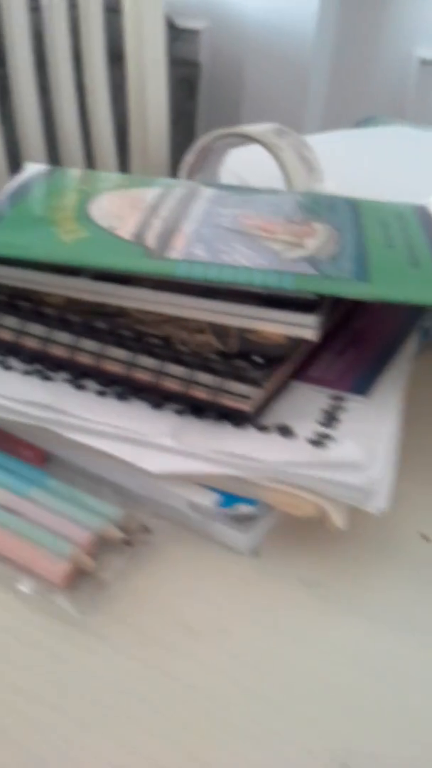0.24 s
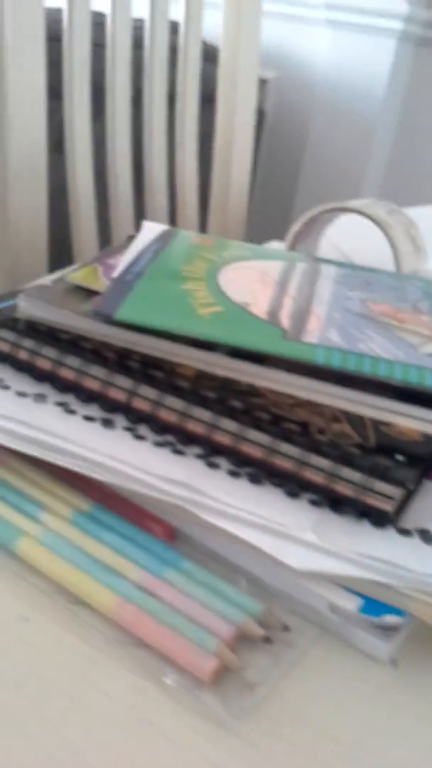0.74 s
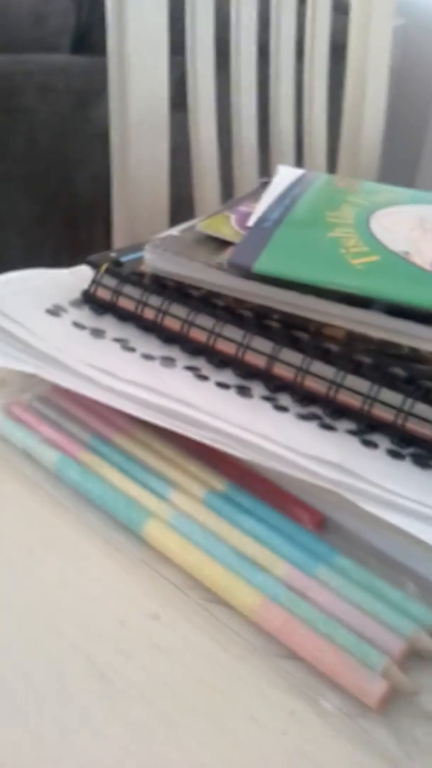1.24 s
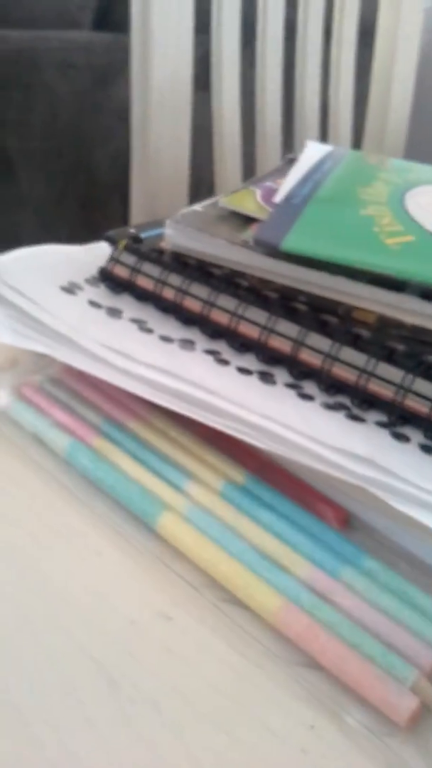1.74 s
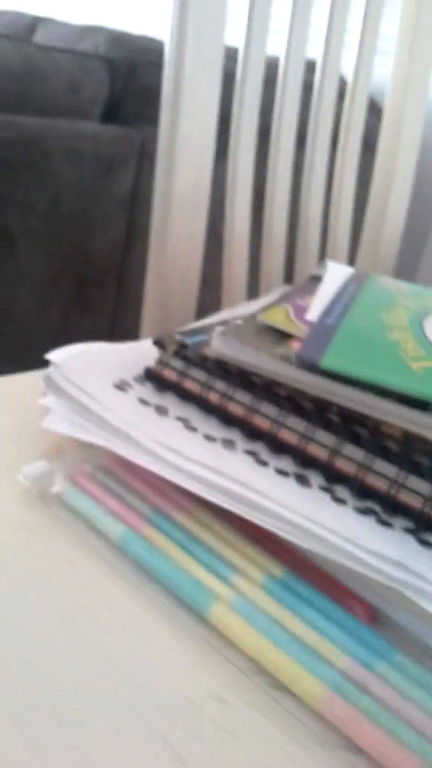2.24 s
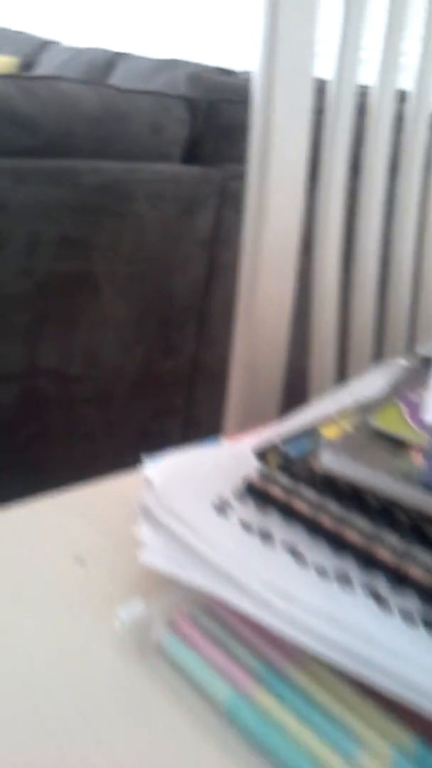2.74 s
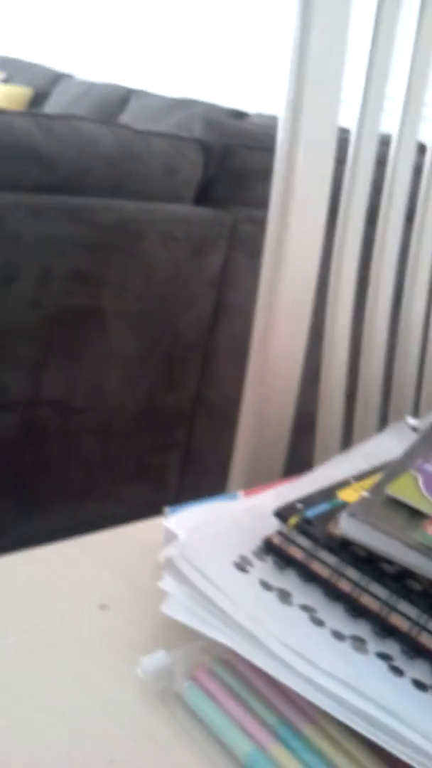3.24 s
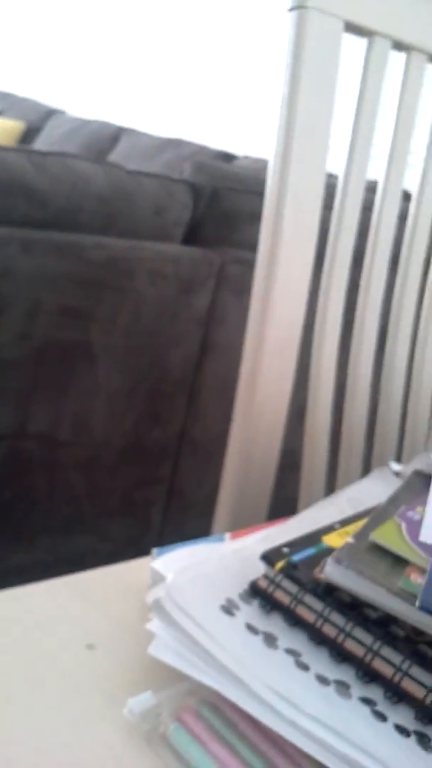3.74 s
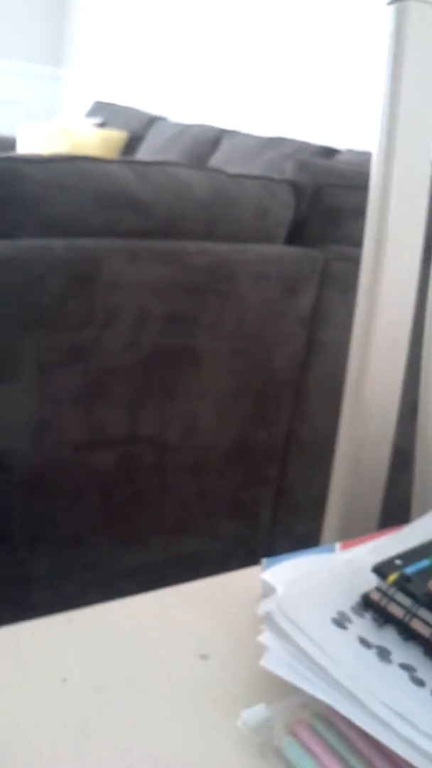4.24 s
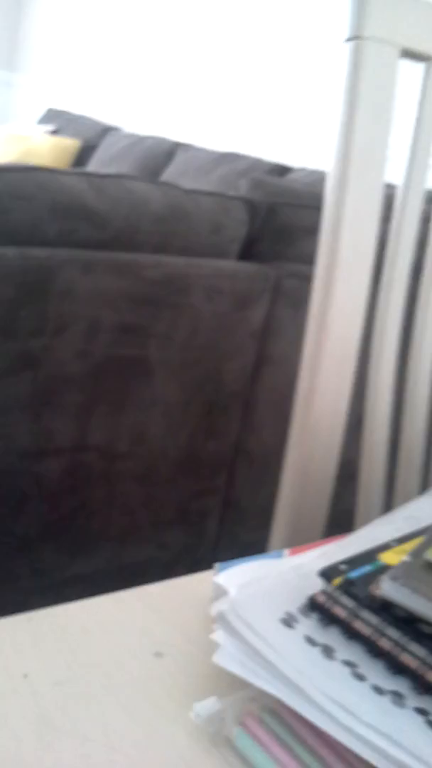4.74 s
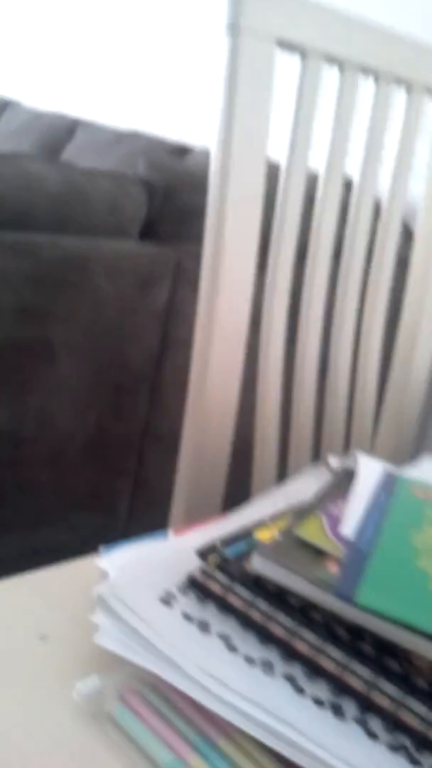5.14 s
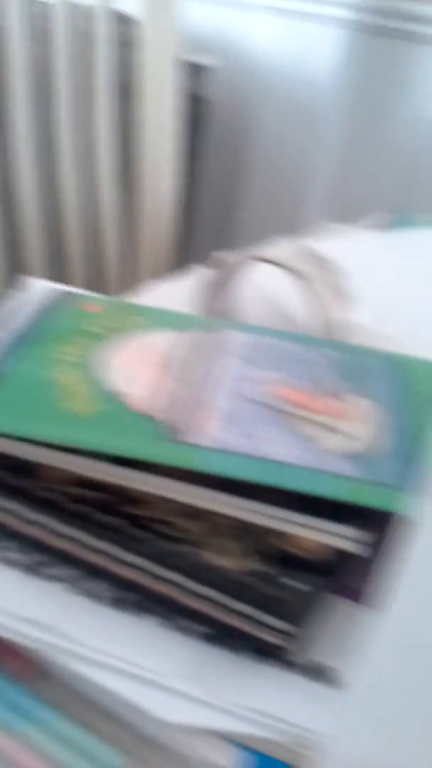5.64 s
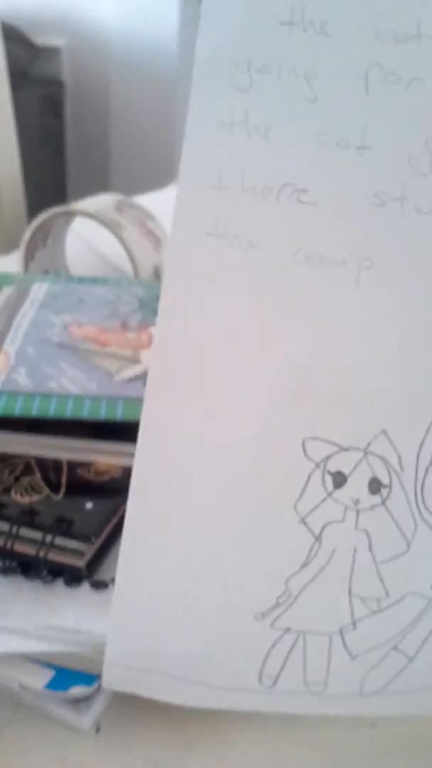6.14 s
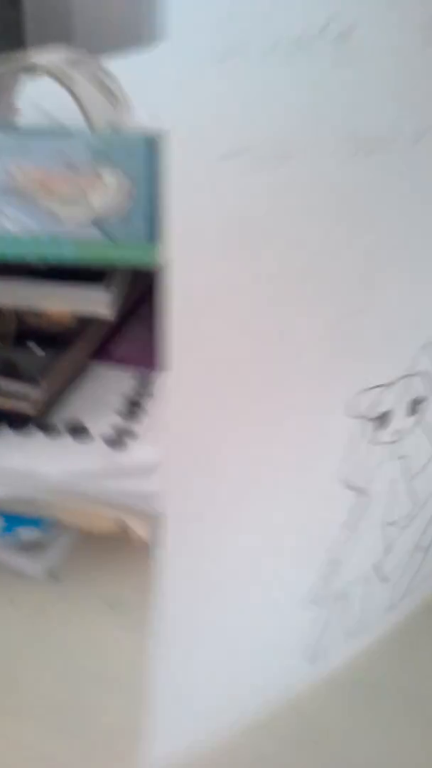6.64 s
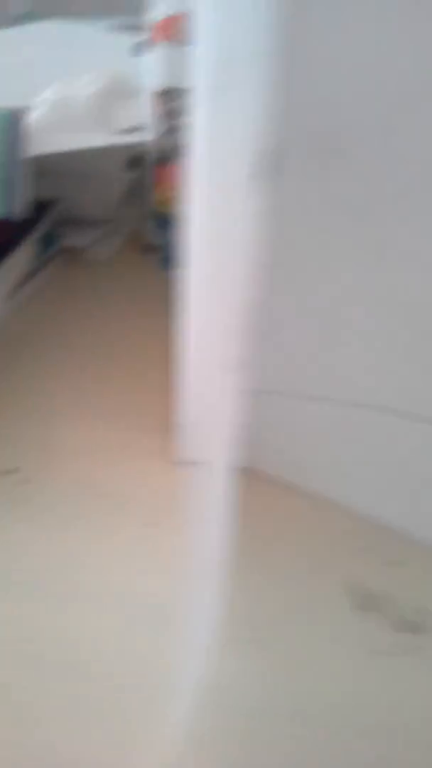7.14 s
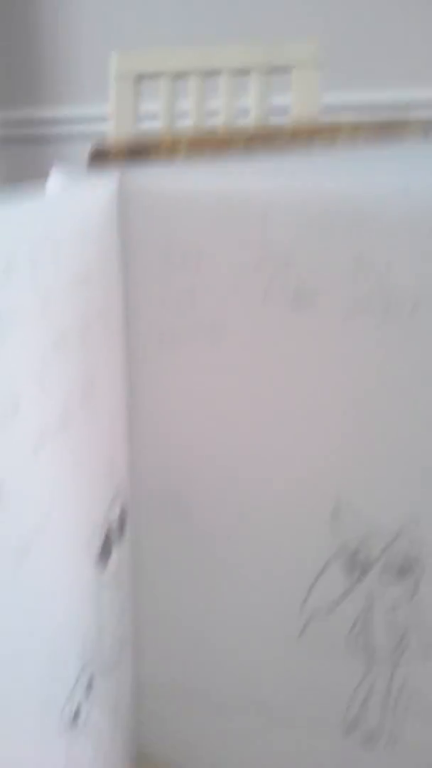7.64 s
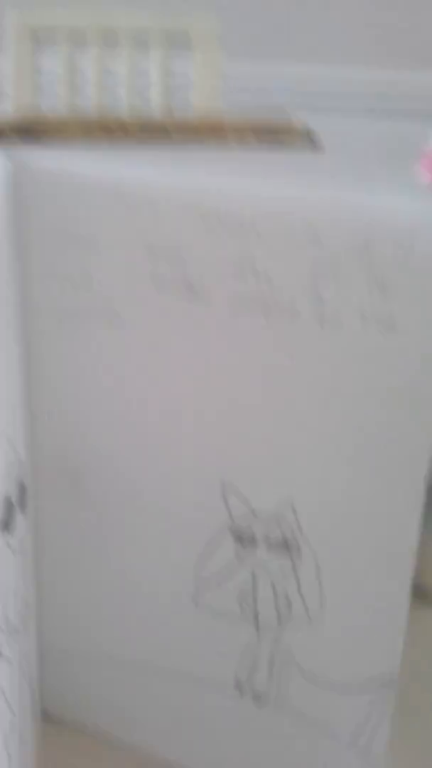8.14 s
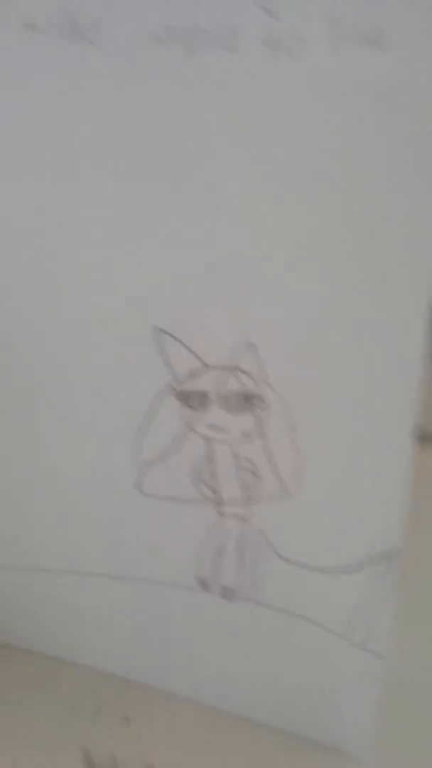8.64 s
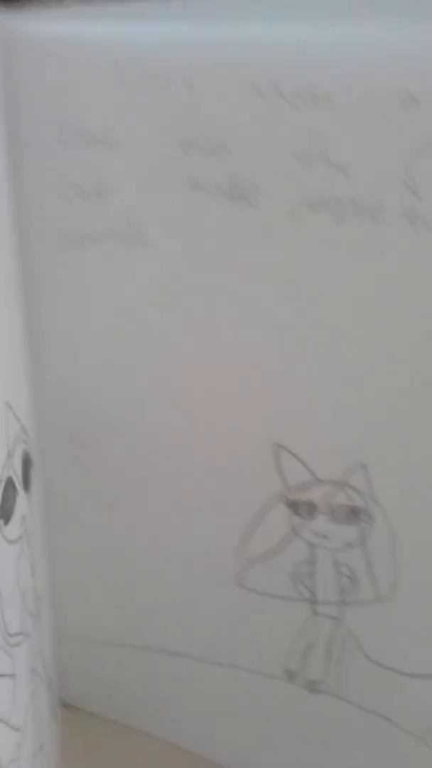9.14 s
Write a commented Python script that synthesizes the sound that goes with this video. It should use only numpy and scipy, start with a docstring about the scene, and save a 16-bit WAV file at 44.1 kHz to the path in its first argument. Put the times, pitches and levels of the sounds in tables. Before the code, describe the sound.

Paper sheets slide softly over a table, close by, above the low murmur of a quiet furnished room. Short rasps and hisses mix with light notebook knocks. At 1.7 seconds a stiff edge clicks sharply on the left, right by the microphone. At 2.7 something hard is set down with a double clack, and a knock at 3.1 leaves a faint, thin ring. Paper edges tick here and there. From about 4.6 to 5.5 the rustling grows stronger, with a run of small bumps, trailing into a very faint squeak near 5.7. Another short rustle and tap come at 6.3, then a lull. From 7.7 a page glides through fingers with a bright hiss, passing from right to left, then bends and buckles in a quick cluster of crisp snaps between 8.2 and 8.4. A few light knocks follow around 9.1.

```python
"""First a paper sheet slides softly over a table, above the low murmur of a quiet room.
More sheets rasp and hiss as their fibres catch, notebooks knock lightly and paper edges tick.
A stiff edge clicks right by the microphone, then something hard is set down with a double clack.
One knock leaves a thin ring, and one pull ends in a faint squeak. Near the end a page glides
through the fingers, bends and buckles in a quick cluster of snaps."""
import sys
import numpy as np
from scipy import signal
from scipy.fft import rfft, irfft, next_fast_len
from scipy.io import wavfile
from scipy.ndimage import uniform_filter1d, map_coordinates

SR = 44100
rng = np.random.default_rng(int(sys.argv[2]) if len(sys.argv) > 2 else 0)


def put_to_file(sound):
    """Save the sound as 16-bit audio at rate SR, in the file named by the first command-line argument."""
    columns = np.atleast_2d(sound).T  # one column per channel
    safe = np.clip(columns, -1, 1)
    whole_steps = np.round(safe * 32767)
    wavfile.write(sys.argv[1], SR, whole_steps.astype(np.int16))


N = 414540
TIME = np.arange(N) / SR
SHORT = np.arange(SR // 4) / SR  # the time line of one short sound [s]


def amp(db):
    """Turn decibels into a number to multiply a sound by."""
    return 10 ** (np.asarray(db) / 20)


def unit(x):
    """Scale a signal so that its average power is 1."""
    return x / np.sqrt(np.mean(x ** 2) + 1e-20)


def norm(x):
    """Scale each channel so that its total energy is 1."""
    return x / np.linalg.norm(x, axis=-1, keepdims=True)


def along(points, hz):
    """Read between (frequency, value) points, with the octaves evenly spaced."""
    freqs, values = np.transpose(points)
    return np.interp(np.log(hz + 1), np.log(freqs + 1), values)


def panned(db):
    """Gains that make the left side db louder than the right, at the same total power."""
    pair = np.array([amp(db / 2), amp(-db / 2)]).reshape(2, -1)
    return pair / np.sqrt(np.mean(pair ** 2, axis=0))


def filtered(x, response):
    """Turn each frequency of x up or down by response(frequency)."""
    n = x.shape[-1]
    padded = next_fast_len(n + SR // 4)
    return irfft(rfft(x, padded) * response(np.fft.rfftfreq(padded, 1 / SR)), padded)[..., :n]


def coloured(x, points):
    """Give x the tone of (frequency, level) points, without smearing it to before its start."""
    def response(hz):
        cepstrum = irfft(np.log(amp(along(points, hz))))
        half = len(cepstrum) // 2
        forward_only = np.r_[cepstrum[0], 2 * cepstrum[1:half], np.zeros(half)]
        return np.exp(rfft(forward_only))
    return filtered(x, response)


def resonances(peaks, hz):
    """Add up the power of (frequency, width, level) peaks: the pitches a thing likes to ring at."""
    return sum(amp(db) ** 2 / (1 + (2 * (hz - centre) / width) ** 2) for centre, width, db in peaks)


# How alike left and right sound: (frequency [Hz], likeness [1 = same, 0 = unrelated])
LIKENESS = [(30, -0.56), (130, .9), (300, 0.87), (600, 0.33), (1200, -0.078), (4000, 0.04), (12000, 0.016)]

def stereo(x):
    """Blend two unrelated noises as the microphone's two sides hear them: alike in the bass only."""
    def blend(hz):
        angle = np.arccos(np.clip(along(LIKENESS, hz), -1, 1)) / 2
        return np.array([np.cos(angle), np.sin(angle)])
    middle, side = filtered(x, blend)
    return np.array([middle + side, middle - side])


def wobble(rate):
    """A smooth random curve that passes through rate new values a second."""
    return map_coordinates(rng.standard_normal(int(N * rate / SR) + 4), [TIME * rate])


def rush(tone, grain=0, catches_per_s=500, patchy_db=0):
    """Long stereo noise: grain adds tiny catches of fibres, patchy_db adds passing resonances."""
    catches = (rng.random(N) < catches_per_s / SR) * rng.random(N)
    catch_decay = np.exp(-1 / (.0004 * SR))
    roughness = unit(signal.lfilter([1], [1, -catch_decay], catches))
    noise = rng.standard_normal((2, N)) + grain * roughness * rng.standard_normal((2, N))
    bands = signal.stft(noise, nperseg=512)[2]
    patches = uniform_filter1d(rng.standard_normal(bands.shape[1:]), size=3, axis=0)  # blur in pitch
    patches = uniform_filter1d(patches, size=9, axis=1)  # blur in time
    noise = signal.istft(bands * amp(patchy_db * unit(patches)), nperseg=512)[1][:, :N]
    return unit(filtered(stereo(noise), lambda hz: amp(along(tone, hz))))


def burst(fade_s, rise_s=1e-5):
    """A puff of stereo noise. Here and below, a fade is the time a sound takes to drop by 60 dB."""
    swell = 1 - np.exp(-(SHORT / rise_s) ** 2)
    decay = amp(-60 * SHORT / max(fade_s, 1e-3))
    return norm(rng.standard_normal((2, len(SHORT))) * swell * decay)


def add(track, start, sound):
    """Mix a sound into the track, beginning at start seconds."""
    part = track[:, round(start * SR):][:, :sound.shape[1]]
    part += sound[:, :part.shape[1]]


def stroke(start, rise, hold, fall, rise_db=12, fall_db=13):
    """The loudness of one hand movement: it gathers speed, holds and dies away."""
    early = np.maximum(start + rise - TIME, 0) / max(rise, 1e-3)
    late = np.maximum(TIME - (start + rise + hold), 0) / max(fall, 1e-3)
    return amp(-np.minimum(rise_db * early + fall_db * late, 100))


def strokes(rows):
    """Rasp and hiss gains for a series of movements; overlapping ones add their power."""
    power = np.zeros((2, N))
    for *timing, rasp_db, hiss_db in rows:
        power += (amp([[rasp_db], [hiss_db]]) * stroke(*timing)) ** 2
    return np.sqrt(power)


# The lower, rough part of rubbing paper: (frequency [Hz], relative level [dB])
RASP_TONE = [(150, -28), (470, -0.5), (620, -1), (790, -5), (1120, -4.5), (1450, -5), (1780, -3),
             (2150, -5), (2600, -7), (4000, -11), (6000, -23)]

def rubbing(gains, hiss_tone, rasp_db, hiss_db, grain, catches_per_s, judder_db, patchy_db):
    """Paper fibres catch and let go, while the flexing sheet shifts its resonances."""
    rasp_gain, hiss_gain = gains
    pressure = amp(judder_db * wobble(70))
    rasp = rasp_gain * amp(rasp_db) * rush(RASP_TONE, grain, catches_per_s, patchy_db)
    hiss = hiss_gain * amp(hiss_db) * rush(hiss_tone, grain, catches_per_s, patchy_db / 2)
    return pressure * (rasp + hiss)


# Sheet moving over sheet:
# (start [s], rise [s], hold [s], fall [s], relative rasp level [dB], relative hiss level [dB])
SHEET_STROKES = [(0.0, 0.0069, .05, 0.5, -62.5, -61), (0.52, .19, .04, 0.13, -60, -53),
                 (0.54, 0.026, 0.017, 0.063, -54, -63), (0.873, .003, .012, .008, -60, -44),
                 (0.885, 0.039, .025, 0.096, -52, -44.5), (1.05, .05, .05, 0.073, -64, -58),
                 (1.22, 0.32, .04, 0.069, -59, -52), (1.74, 0.017, .12, 0.062, -63, -56),
                 (2.22, 0.074, .01, 0.077, -76, -65), (2.73, .06, 0.072, 0.15, -50.5, -58),
                 (3.12, 0.026, .17, .08, -61, -62.5), (3.44, .03, .02, .08, -68, -60),
                 (3.57, 0.043, .01, 0.075, -67, -59.5), (3.72, .14, 0.018, 0.079, -64, -63.5),
                 (3.99, 0.026, 0.0088, 0.099, -58, -56), (4.08, 0.027, 0.017, .15, -59, -59),
                 (4.15, 0.25, .13, .1, -58, -57.5), (4.59, 0.027, .11, .15, -48, -42.5),
                 (4.68, 0.049, 0.015, .11, -42.5, -44.5), (4.86, 0.035, .02, 0.23, -60, -56.5),
                 (5.13, 0.12, 0.045, .08, -60.5, -59), (5.34, 0.088, .12, 0.097, -48.5, -51),
                 (5.41, 0.085, 0.0056, 0.057, -51, -41), (5.9, 0.058, 0.0072, 0.065, -57, -56.5),
                 (6.26, 0.046, 0.02, 0.054, -55, -47), (6.4, 0.037, .005, 0.033, -55.5, -55.5),
                 (6.82, 0.072, .01, 0.12, -63, -62.5), (7.24, .13, .02, 0.13, -75, -65),
                 (8.45, 0.046, .03, 0.28, -65, -66), (8.98, 0.087, 0.14, 0.091, -63, -66.5)]
# The hiss of those sheets: (frequency [Hz], relative level [dB])
SHEET_HISS_TONE = [(1800, -23), (3000, -13.5), (4400, -7.5), (5800, -1.5), (7500, -7), (9000, -11.5),
                   (12000, -16.5), (14500, -21)]

def sliding_sheets():
    """Sheets rub with each push of the hand; in between, the pile never lies quite still."""
    stirring = amp([[-71], [-73]]) * amp(1.5 * wobble(rate=6))  # faint rasp and hiss gains
    gains = np.hypot(strokes(SHEET_STROKES), stirring)
    return rubbing(gains, SHEET_HISS_TONE, rasp_db=-2, hiss_db=1,
                   grain=0.63, catches_per_s=1500, judder_db=1.37, patchy_db=4)


# The low murmur of the room and of handling: (time [s], relative level [dB])
MURMUR_LEVELS = [(0.0, -58.5), (0.52, -63), (0.94, -57.5), (1.75, -58), (2.02, -63), (2.67, -63.5),
                 (2.88, -58), (3.61, -62), (5.58, -58), (6.1, -62), (7.59, -62), (8.46, -56.5),
                 (8.87, -63.5), (9.4, -63)]
# The tone of that murmur: (frequency [Hz], relative level [dB])
MURMUR_TONE = [(15, -56), (25, -32), (33, -69), (75, -27), (109, -10.5), (130, -5.5), (168, -5),
               (213, -4.5), (263, -0.5), (335, -1), (494, -7), (900, -17), (1170, -34), (1980, -120)]
# Low notes that the room strengthens: (frequency [Hz], width [Hz], relative level [dB])
ROOM_NOTES = [(144.6, 12.7, 5.5), (210, 16.6, 6.5), (338.5, 7.9, 5), (402, 62, -1)]
# Faint humming tones: (frequency [Hz], typical level [dB])
HUM_NOTES = [(141, -75), (337, -70.5)]
# The even background hiss: (frequency [Hz], relative level [dB])
AIR_TONE = [(290, -16.5), (500, -9.5), (666, -14), (827, -7), (1470, -13.5), (3740, -16.5), (5920, -19),
            (8600, -18.5), (13800, -18.5), (14800, -22), (15500, -56)]

def background(murmur_boost_db=1.5, air_db=-66):
    """A low murmur that gathers at the room's own notes, a faint wavering hum and an even hiss."""
    murmur_db = np.interp(TIME, *np.transpose(MURMUR_LEVELS)) + murmur_boost_db
    murmur = unit(filtered(rush(MURMUR_TONE), lambda hz: np.sqrt(1 + resonances(ROOM_NOTES, hz))))
    hum = sum(amp(db + 3 * wobble(7.9)) * np.sin(2 * np.pi * hz * TIME + wobble(6))
              for hz, db in HUM_NOTES)
    return amp(murmur_db) * murmur + hum + amp(air_db) * rush(AIR_TONE)


# Light knocks on the table: (time [s], relative scuff level [dB], contact time [s],
# relative thud level [dB], thud pitch [Hz], scuff fade [s])
LIGHT_KNOCKS = [(0.281, -11.5, .0005, -12, 230, .065), (0.556, -4, 0.0004, -14, 410, 0.087),
                (0.737, -7, .00085, -12, 363, 0.062), (0.81, -5.5, 0.00073, -21, 317, 0.024),
                (1.074, -8.5, .0008, -17, 350, 0.061), (1.381, -4.5, .00083, -4.5, 324, .059),
                (1.622, -3.5, .0007, -2, 330, .09), (3.125, -13, .0003, 0, 332, 0.023),
                (4.09, -19, 0.00048, -5.5, 453, .033), (4.623, -6, .00045, -24, 500, .046),
                (4.722, -4.5, 0.00046, -6.5, 543, .06), (4.74, -6, .0008, -8, 500, .05),
                (4.757, -6, .00053, -3, 463, 0.048), (4.897, -4.5, 0.00052, -5, 484, 0.12),
                (5.198, -1, 0.00036, -8, 480, 0.055), (5.341, -19, 0.00047, -11, 450, 0.03),
                (5.381, -8.5, .0007, -7.5, 384, 0.067), (5.545, -9.5, 0.00044, -0.5, 260, .08),
                (5.96, -15, 0.00071, -18, 298, .03), (6.275, -7.5, 0.00016, 2, 383, 0.0065),
                (6.324, -12, 0.00057, -7.5, 517, .035), (6.829, -15, 0.00071, -19, 350, 0.021),
                (9.095, -1, .0011, -3, 394, 0.045), (9.111, -10, .00125, -5.5, 322, 0.046),
                (9.193, 2, 0.00069, -5, 440, 0.026)]
# The scuff before the soft contact dulls it: (frequency [Hz], relative level [dB])
SCUFF_TONE = [(150, -23.5), (600, -1.5), (1000, 1), (1400, -2.5), (2100, -1.5), (4000, -2), (6000, 3),
              (9500, -8.5), (15000, -13)]

def knocks(rise_s=0.0011):
    """A cushioned bump gives one low push, a shudder of the table top and a brief scuff of the pile."""
    out = np.zeros((2, N))
    push = 1. * (SHORT == 0)
    for start, scuff_db, contact_s, thud_db, hz, fade_s in LIGHT_KNOCKS:
        shudder = 1.15 * norm(stereo(burst(2 * fade_s, 2 * rise_s)))
        scuff = norm(stereo(burst(fade_s, rise_s) + 0.67 * burst(0.014, rise_s)))
        # where the table is hit sets the pitch of the thud
        thud_tone = [(hz / 6, -36), (hz / 2, -9), (hz, 2), (2 * hz, -10), (6 * hz, -50)]
        add(out, start, amp(thud_db) * coloured(push + shudder, thud_tone))
        # the longer the contact, the duller the scuff
        cushion = lambda f: 1 / (1 + 1j * np.sqrt(2) * f * contact_s - (f * contact_s) ** 2)
        add(out, start, amp(scuff_db) * filtered(coloured(scuff, SCUFF_TONE), cushion))
    return out * panned(1.8)


# Paper edges ticking and buckling:
# (time [s], relative level [dB], pitch [Hz], relative level of the low part [dB], left over right [dB])
PAPER_SNAPS = [(0.8754, -34, 5950, -24, -6), (0.8837, -32, 6100, -22, 3), (1.7456, -26.5, 4300, 5.5, 17),
               (2.8529, -34.5, 5350, -13, 0.0), (2.8923, -32, 5390, -3, -1), (3.4633, -32.5, 5400, -32, 4),
               (4.016, -32, 6200, -12, 7), (4.0337, -32.5, 6150, -26, 7.0), (4.1455, -32, 5160, -10.5, 7),
               (4.426, -27.5, 5800, -13, -3), (4.491, -35, 6580, -26, 3), (4.6054, -33, 7250, -18, -8),
               (5.023, -32, 4700, -6, -1), (7.0244, -37, 6400, -46, -8), (7.0459, -33, 6300, -48, 2),
               (7.674, -33.5, 7610, -8.5, -7), (8.0511, -27, 5230, -17, 15), (8.2314, -26.5, 6150, -11, 14),
               (8.2646, -17.5, 5770, -21, 1), (8.305, -16, 6160, -33, 2), (8.307, -22, 6300, -35, 3),
               (8.3584, -28, 6160, -36, -4), (8.3637, -28, 5800, -28, 10), (8.3704, -22, 6100, -43, 12),
               (8.3752, -14, 6050, -44, 13), (8.3787, -12.5, 6650, -32, 6), (8.4441, -33, 4450, -19, 19),
               (8.5131, -41, 6330, -29, 15)]
# The bright part of a snap: (frequency [times the snap's pitch], relative level [dB])
SNAP_TONE = [(.55, -14.5), (.8, -8.5), (1, 1.5), (1.25, -9.5), (1.6, -20.5), (2.5, -21.5)]

def paper_snaps(boost_db=12):
    """Paper pops into a new shape in a millisecond, at a pitch of its own, and flutters afterwards."""
    out = np.zeros((2, N))
    for start, db, hz, low_db, pan_db in PAPER_SNAPS:
        crack = burst(0.004, rise_s=0.00096)
        flutter = 0.27 * burst(0.013, rise_s=0.0036)
        low_tone = [(100, low_db - 24), (500, low_db - 2), (0.33 * hz, low_db)]
        high_tone = [(multiple * hz, level) for multiple, level in SNAP_TONE]
        snap = norm(coloured(crack + flutter, low_tone + high_tone))
        add(out, start, amp(db + boost_db) * panned(pan_db) * snap)
    return out


# One sharp click on the left and its rebounds: (time [s], level [dB], left over right [dB])
CLICK_HITS = [(1.715, -0.5, 21), (1.7151, -18, 17), (1.718, -20, 8)]
# The tone of the click: (frequency [Hz], relative level [dB])
CLICK_TONE = [(60, -20), (200, -1), (900, 4), (2500, -4), (4300, 1.5), (6500, 3), (9000, -6.5),
              (15000, -19)]

def edge_click(thump_db=-16):
    """A stiff edge snaps right by the microphone and thumps the hand-held camera that carries it."""
    out = np.zeros((2, N))
    spike = -1. * (SHORT == 0)
    for start, db, pan_db in CLICK_HITS:
        crack = spike + 0.48 * burst(0.016)
        add(out, start, amp(db) * panned(pan_db) * norm(coloured(crack, CLICK_TONE)))
    thump_tone = [(40, -31), (110, -5), (220, 0), (600, -9), (1500, -27), (5000, -52)]
    thump = coloured(stereo(burst(0.16)), thump_tone)
    add(out, CLICK_HITS[0][0], amp(thump_db) * norm(thump))
    return out


# A hard thing meeting the table: (time [s], level [dB], rattle fade [s], brightness [dB per octave])
CLACK_HITS = [(2.6900, 1.5, 0.02, 4), (2.7011, 0, 0.015, -1.5), (2.7050, 0, 0.073, -2),
              (2.737, -12, 0.067, -5), (2.746, -10, 0.16, -6), (2.7680, 1.5, 0.019, 2)]
# The notes that ring at each hit: (frequency [Hz], relative level [dB], fade [s])
CLACK_NOTES = [(480, -7, 0.077), (740, -6, 0.12), (1386, -10, 0.099), (1430, -4, 0.094), (1720, -9, 0.083),
               (1947, 3, 0.08), (2125, -2, 0.057), (2340, 2, 0.065), (2700, -21, 0.044), (2990, 0, 0.05),
               (3520, -3, 0.045), (5990, -1, 0.022)]
# The rattle of each hit: (frequency [Hz], relative level [dB])
RATTLE_TONE = [(60, -42), (230, -18), (380, -8), (1000, -5), (1450, -1.5), (2400, -1.5), (3800, -8.5),
               (5800, -11), (7500, -25), (9600, -42), (15000, -62)]

def double_clack(ring_db=-6.5, rise_s=0.0014):
    """Something hard is set down: each hit rattles and rings the same notes at new strengths."""
    out = np.zeros((2, N))
    hz, note_db, note_fade_s = np.transpose(CLACK_NOTES)[:, :, None]
    swell = 1 - np.exp(-SHORT / rise_s)
    for start, db, fade_s, brightness in CLACK_HITS:
        phase = 2 * np.pi * rng.random((2, len(hz), 1))
        decay = amp(note_db + rng.normal(0, 1.2, hz.shape) - 60 * SHORT / note_fade_s)
        notes = decay * np.sin(2 * np.pi * hz * SHORT + phase)
        ring = norm(notes.sum(axis=1) * swell)
        tone = [(f, level + brightness * np.log2(f / 2000)) for f, level in RATTLE_TONE]
        rattle = norm(coloured(stereo(burst(fade_s, rise_s)), tone))
        add(out, start, amp(db) * (rattle + amp(ring_db) * ring))
    return out * panned(4.7)


# The high notes of a thin ring: (frequency [Hz], width [Hz], relative level [dB], fade [s])
RING_NOTES = [(5500, 1000, -0.5, 0.32), (6150, 210, -1, 0.6), (7320, 710, -3.5, 0.67),
              (9550, 400, -15, 0.49), (12000, 700, -13, 0.46)]

def thin_ring(start=3.126, db=-15):
    """After one knock a few fuzzy high notes hang on, like those of a notebook's wire binding."""
    out = np.zeros((2, N))
    for hz, width, note_db, fade_s in RING_NOTES:
        note = filtered(burst(fade_s), lambda f: resonances([(hz, width, 0)], f))
        add(out, start, amp(db + note_db) * norm(note))
    return out * panned(-4)


def squeak(peak_s=5.72, spread_s=0.15, hz=2060, db=-69):
    """A faint, narrow rubbing tone trails a long pull of a sheet."""
    swell = np.exp(-((TIME - peak_s) / spread_s) ** 2)
    return amp(db) * swell * rush([(0.67 * hz, -35), (hz, 0), (1.6 * hz, -35)])


# A page moving through the fingers: (start [s], rise [s], hold [s], fall [s],
# relative rasp level [dB], hiss level [dB], left over right [dB])
GLIDE_STROKES = [(7.676, 0.0082, 0.052, 0.049, -76, -43.5, -4), (7.818, 0.026, 0.05, 0.037, -72, -42, -5),
                 (7.902, 0.044, .028, 0.014, -49, -29.5, 6), (8.042, 0.015, .066, .012, -51, -36.5, 13)]
# A bright paper hiss, with a narrow gap near 2640 Hz that is not the page's own:
# (frequency [Hz], relative level [dB])
BRIGHT_HISS_TONE = [(1470, -51), (2500, -18), (2640, -45), (2910, -29), (4230, -9.5), (5660, -2), (7980, 0),
                    (9510, -13), (12200, -9.5), (14300, -13), (14900, -21), (15500, -78)]

def gliding_page():
    """A smooth page hisses as it is drawn through the fingers, passing from right to left."""
    hiss = rush(BRIGHT_HISS_TONE, grain=0.45, catches_per_s=2000, patchy_db=1.8)
    rasp = amp(-1) * rush([(1300, -26), (2250, -2), (3500, 3), (5000, -16)])
    return sum(stroke(*timing) * panned(pan_db) * (amp(hiss_db) * hiss + amp(rasp_db) * rasp)
               for *timing, rasp_db, hiss_db, pan_db in GLIDE_STROKES)


# The page being bent:
# (start [s], rise [s], hold [s], fall [s], relative rasp level [dB], relative hiss level [dB])
BEND_STROKES = [(8.195, 0.062, 0.036, .03, -54, -36.5), (8.312, 0.0075, .025, 0.014, -56, -32),
                (8.356, 0.017, 0.008, .002, -51, -25.5), (8.39, .02, 0.037, 0.05, -56.5, -43.5)]
# The hiss heard as the page bends: (frequency [Hz], relative level [dB])
BEND_HISS_TONE = [(1470, -46), (2500, -22), (4400, -10), (4860, -2.5), (5320, -5), (5920, -0.5), (7220, -5),
                  (8550, -10.5), (13900, -14.5), (14800, -17), (15500, -35)]

def bending_page():
    """The page rubs in short, grainy strokes as it bends, a little to the left."""
    return panned(3.8) * rubbing(strokes(BEND_STROKES), BEND_HISS_TONE, rasp_db=1, hiss_db=-3.5,
                                 grain=1, catches_per_s=1400, judder_db=-0.8, patchy_db=5.5)


# How long the room's echo lasts: (frequency [Hz], fade [s])
ECHO_FADES = [(150, 0.67), (1000, 0.17), (6000, 0.13), (14000, 0.2)]

def room_echo(x):
    """The echo of a furnished room: each frequency dies away at its own speed."""
    hz, t, bands = signal.stft(rng.standard_normal((2, SR // 2)), SR, nperseg=256)
    decay = amp(-60 * t / along(ECHO_FADES, hz)[:, None])
    tail = signal.istft(bands * decay, SR, nperseg=256)[1]
    tail = np.pad(norm(stereo(tail)), ((0, 0), (SR // 200, 0)))  # arrives 5 ms late
    mono = x.sum(axis=0, keepdims=True) / np.sqrt(2)
    return signal.fftconvolve(mono, tail, axes=1)[:, :N]


def scene():
    """Mix it all: sounds near the microphone have almost no echo, hits on the table have more."""
    sheets = sliding_sheets()
    near = bending_page() + gliding_page() + paper_snaps() + edge_click()
    table = knocks() + double_clack()
    echo = room_echo(amp(-23) * near + amp(-10.5) * table)
    return sheets + near + table + echo + thin_ring() + squeak() + background()


def record(dry):
    """Cut away the very highest treble."""
    top_hz = 14500
    return filtered(dry, lambda hz: 1 / np.sqrt(1 + (hz / top_hz) ** 200))


dry = scene()
out = record(dry)
put_to_file(out)
```